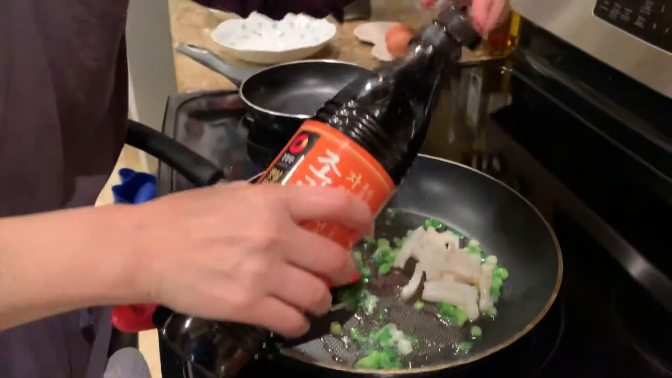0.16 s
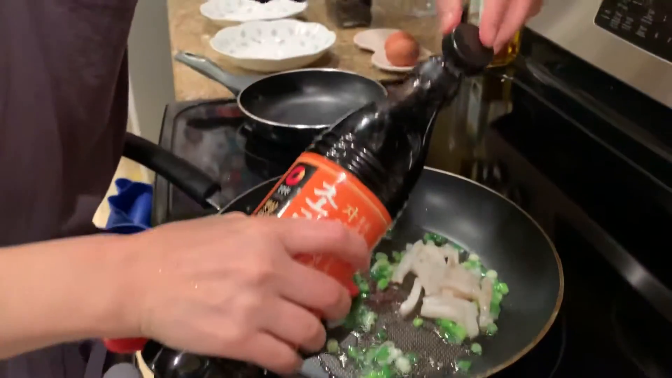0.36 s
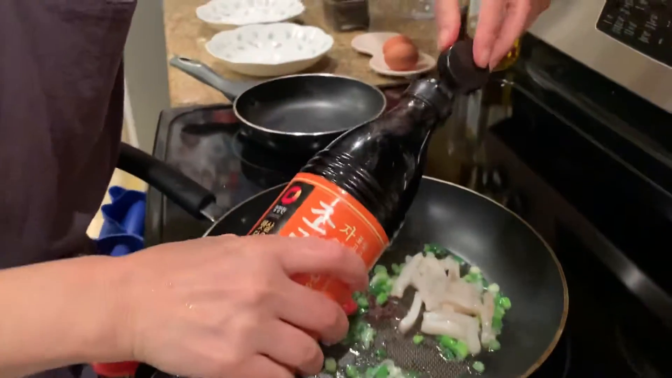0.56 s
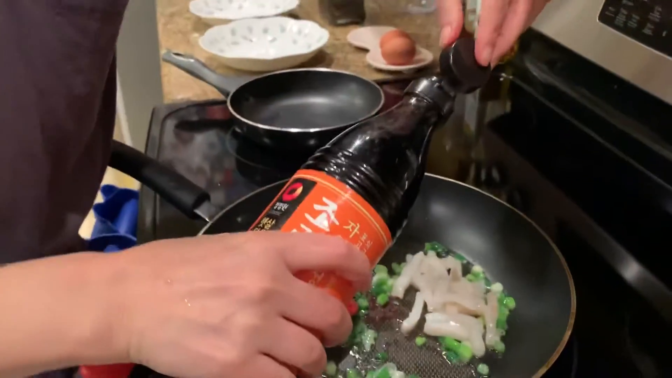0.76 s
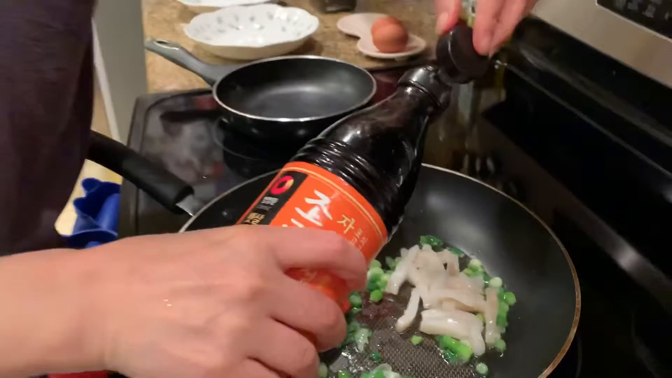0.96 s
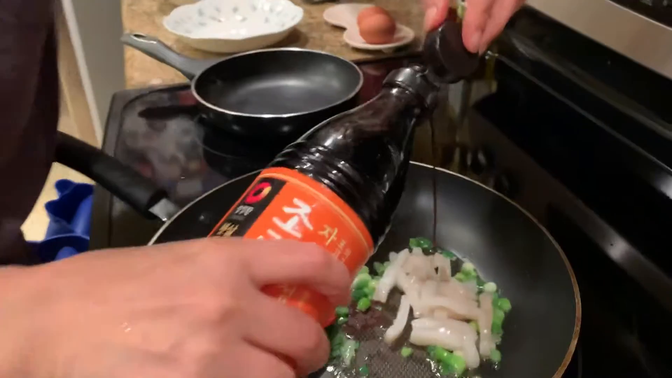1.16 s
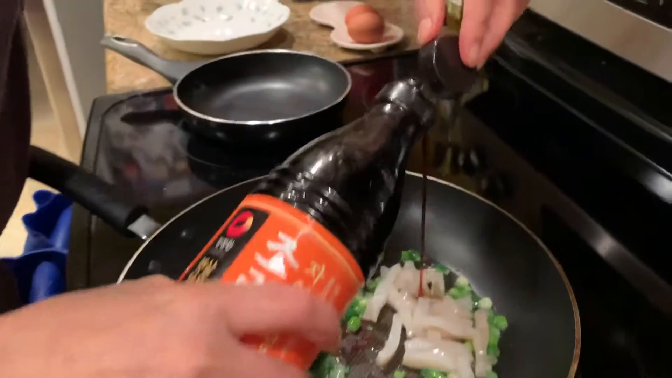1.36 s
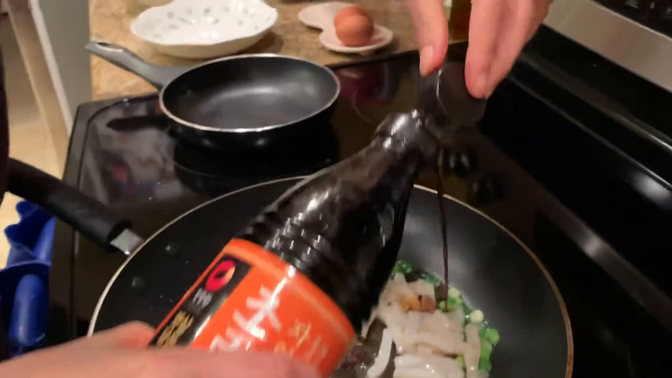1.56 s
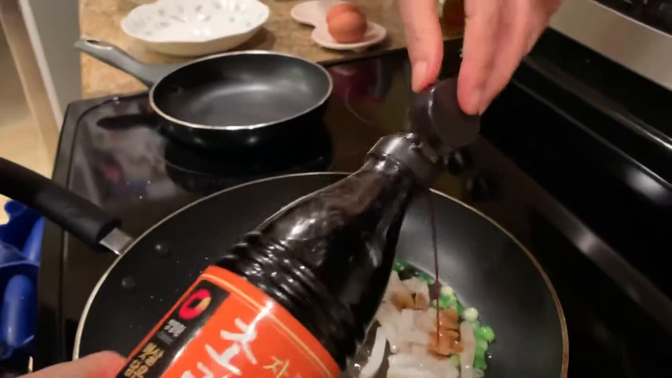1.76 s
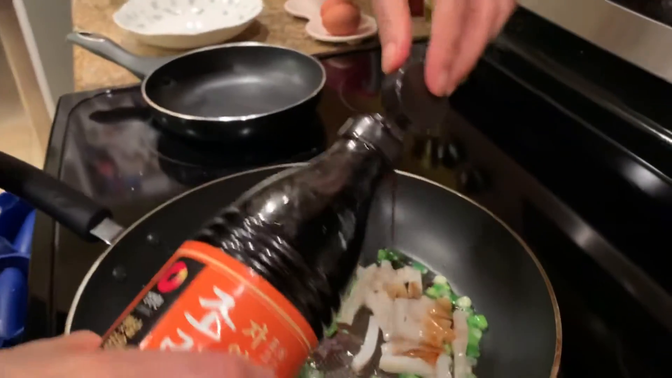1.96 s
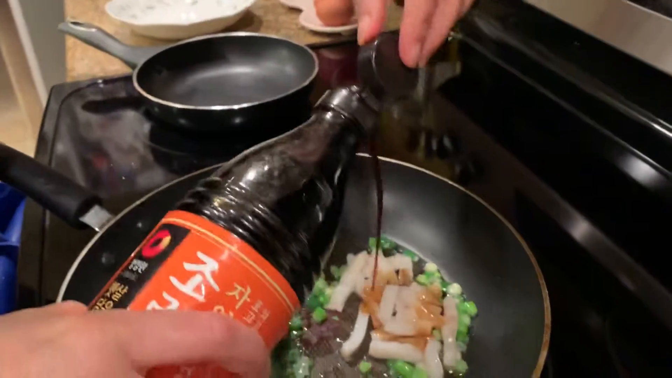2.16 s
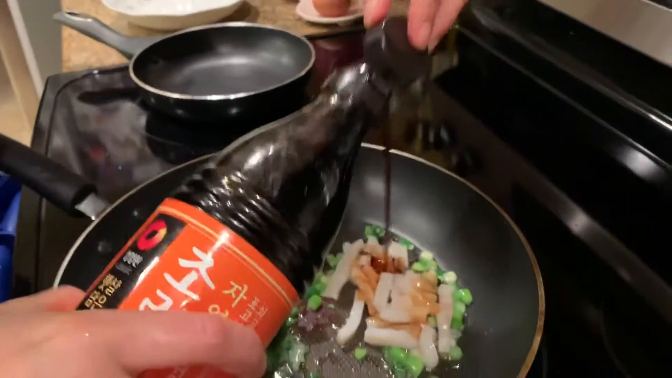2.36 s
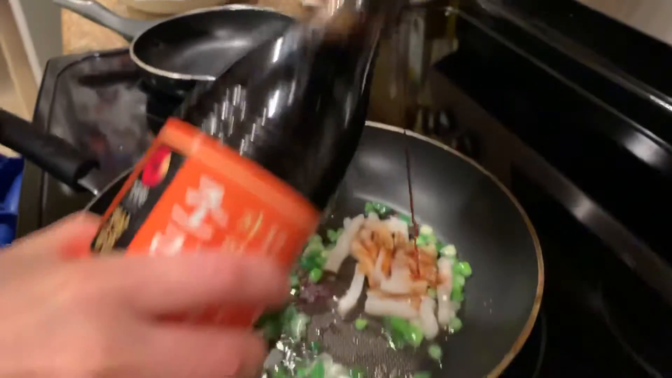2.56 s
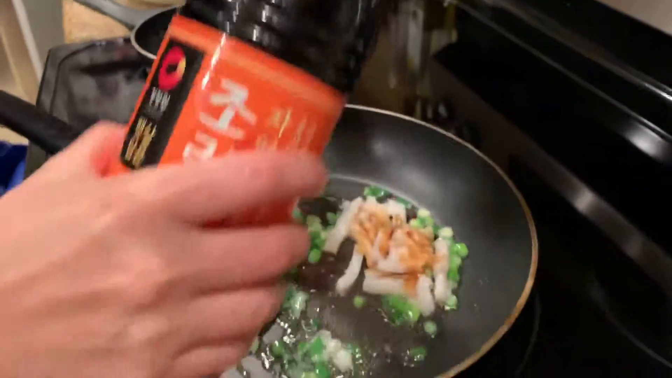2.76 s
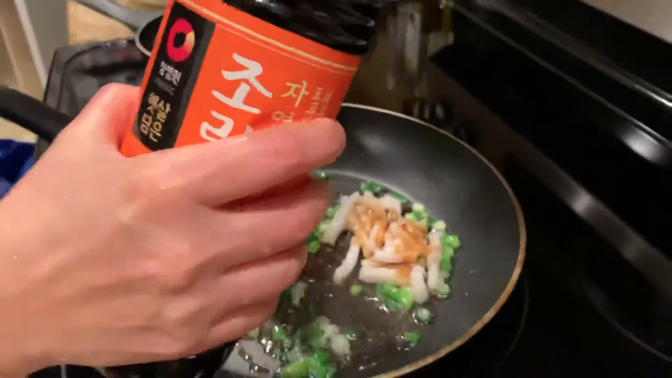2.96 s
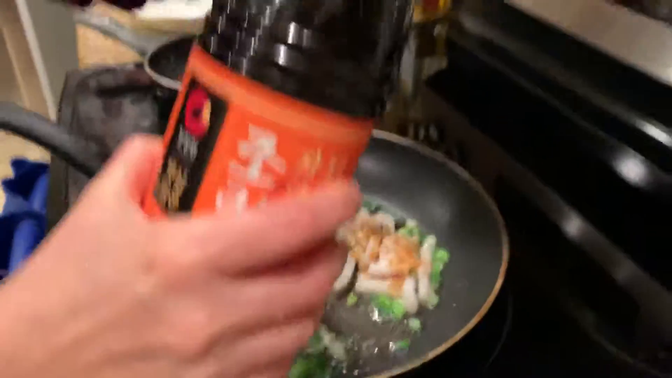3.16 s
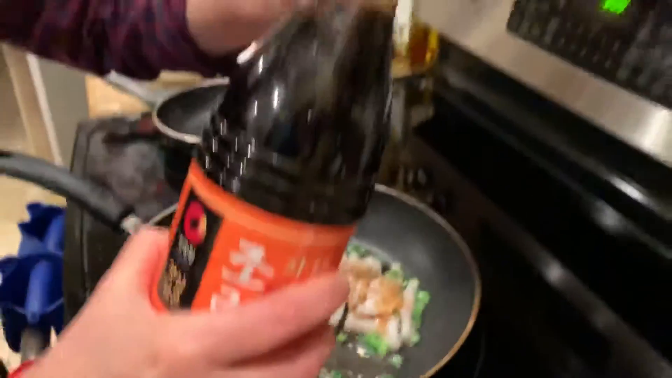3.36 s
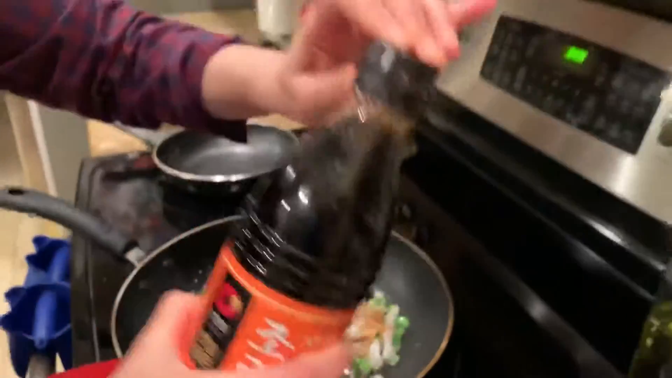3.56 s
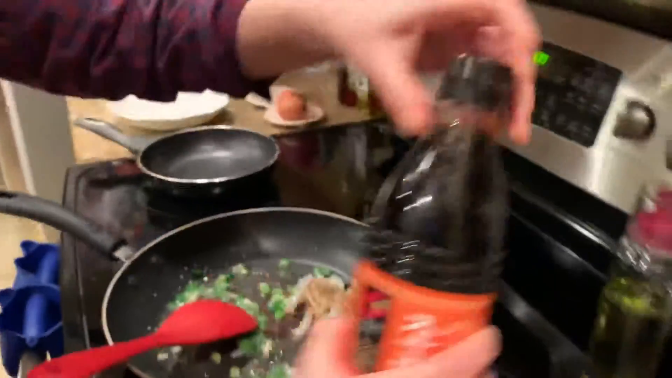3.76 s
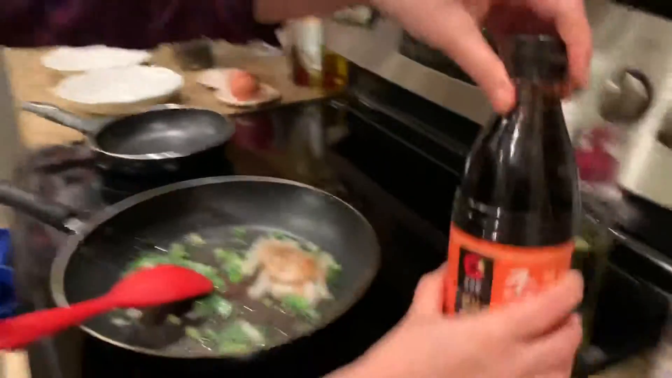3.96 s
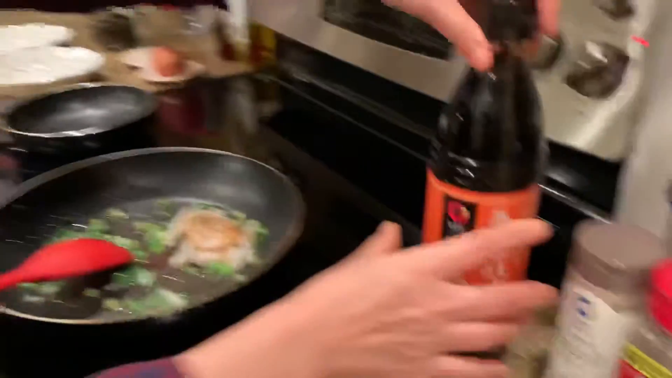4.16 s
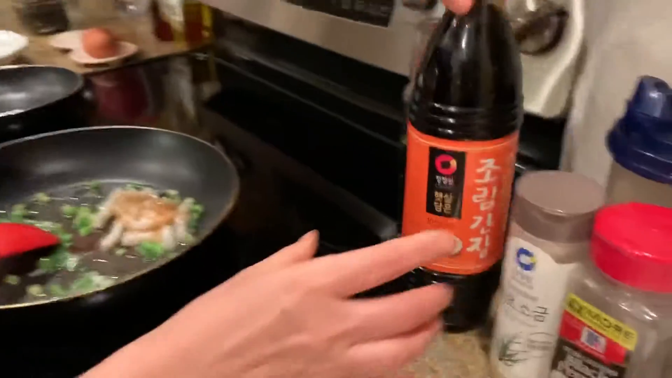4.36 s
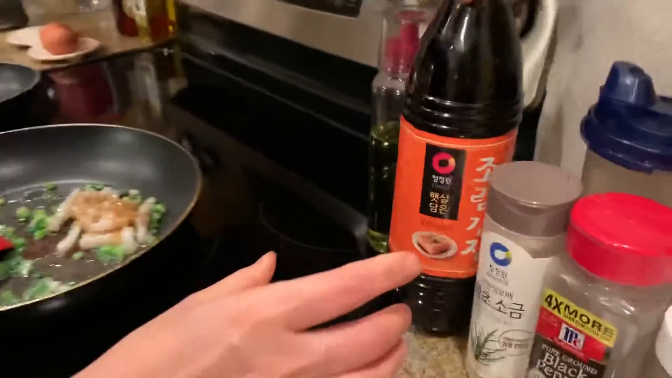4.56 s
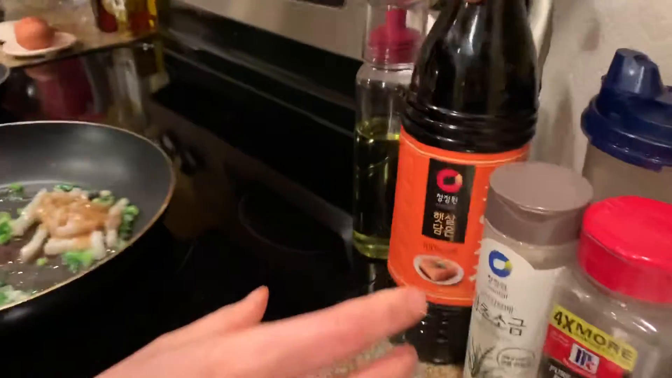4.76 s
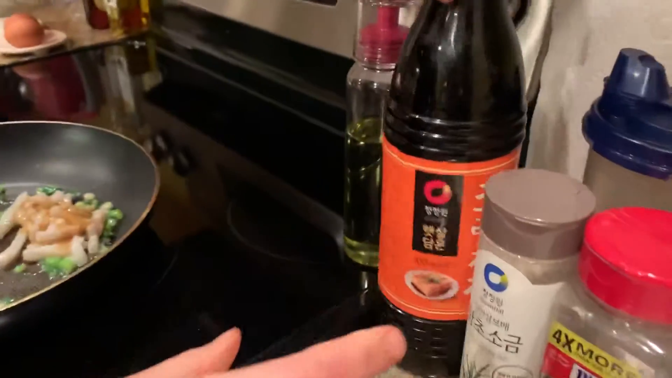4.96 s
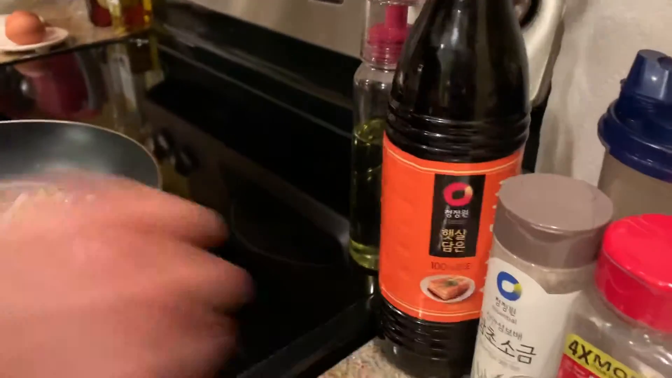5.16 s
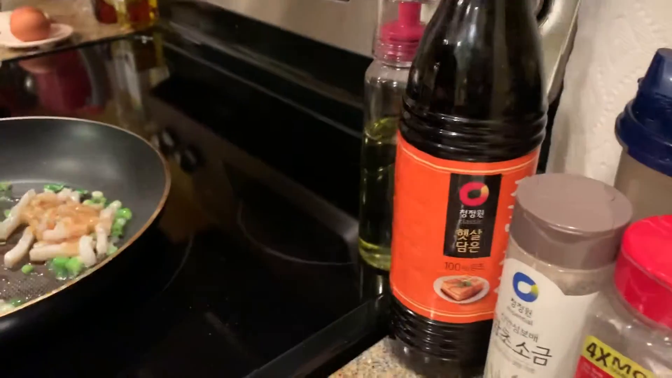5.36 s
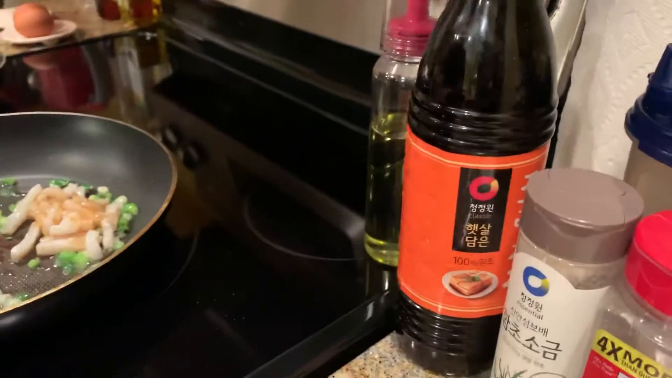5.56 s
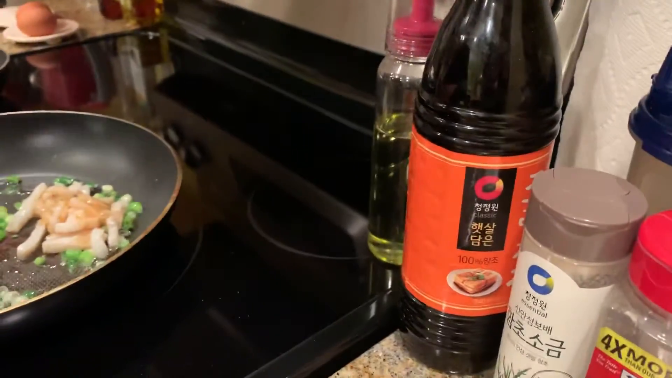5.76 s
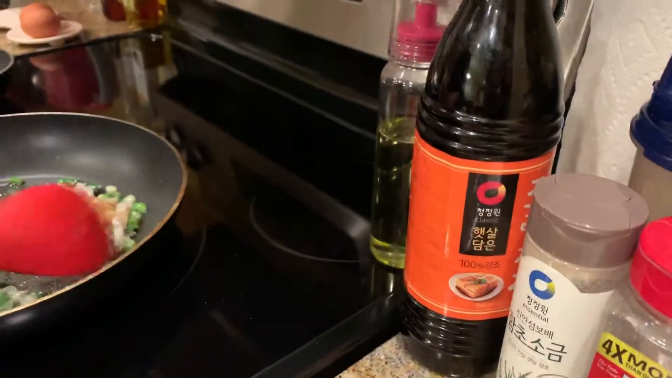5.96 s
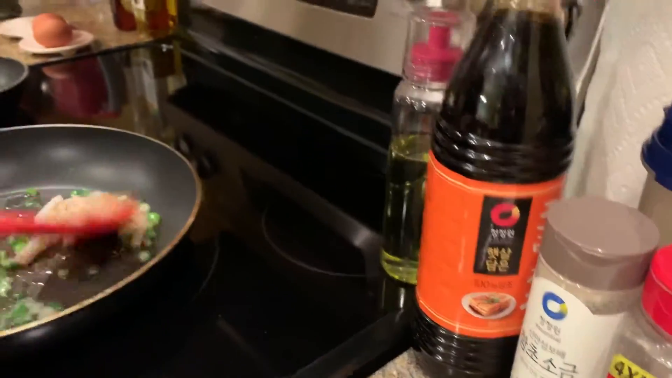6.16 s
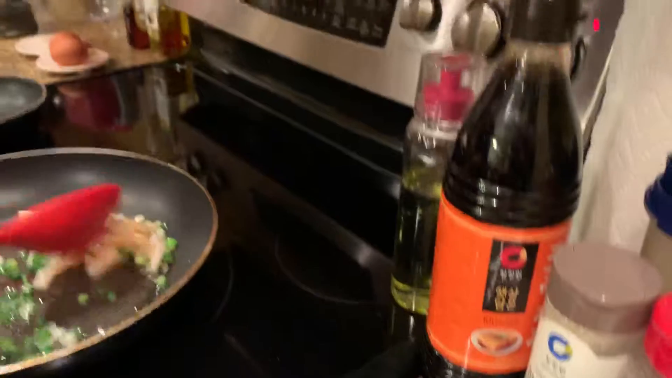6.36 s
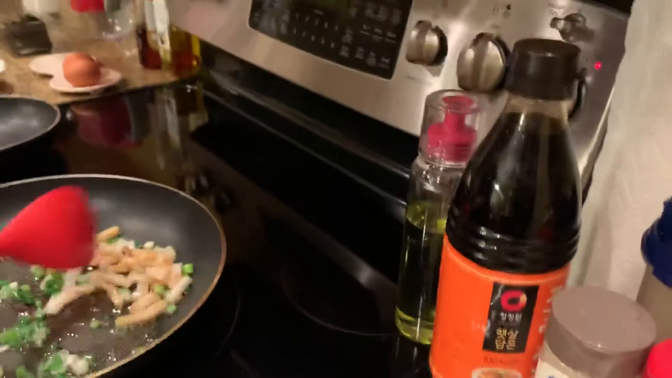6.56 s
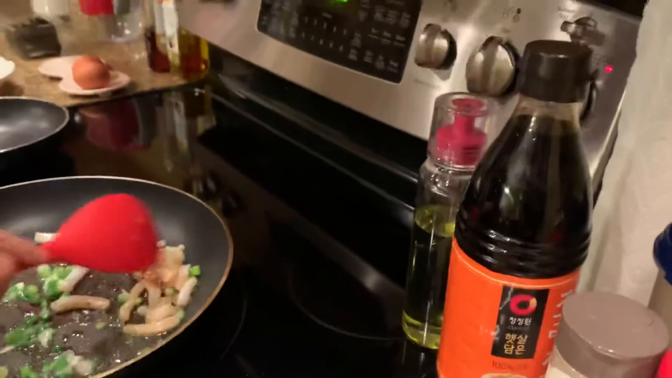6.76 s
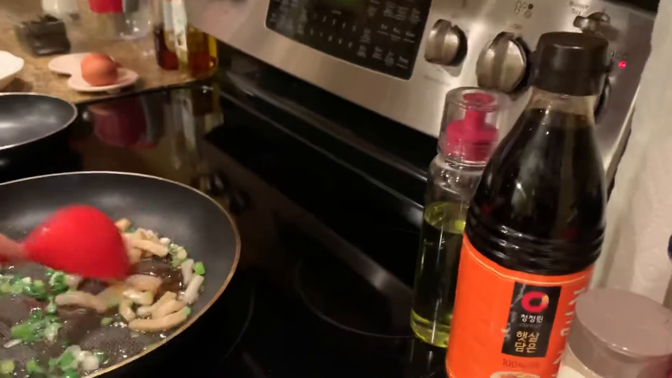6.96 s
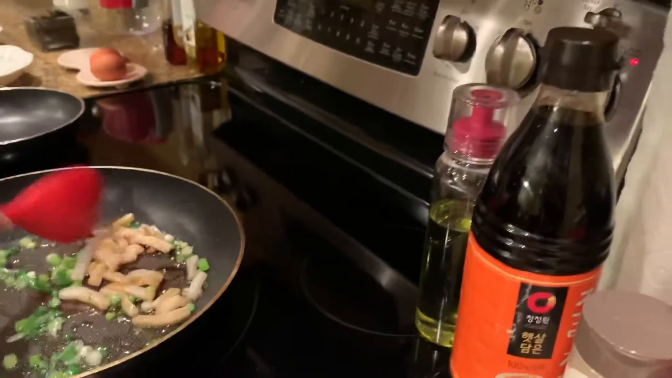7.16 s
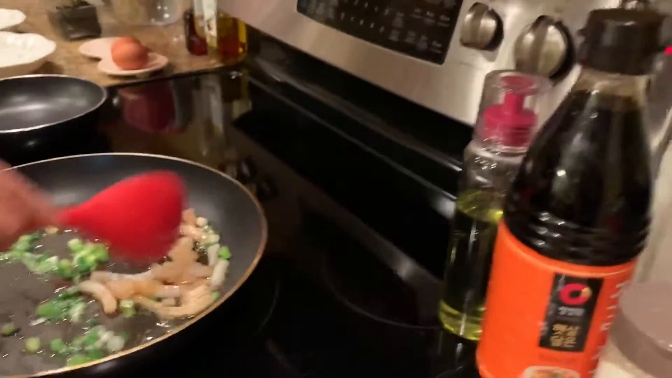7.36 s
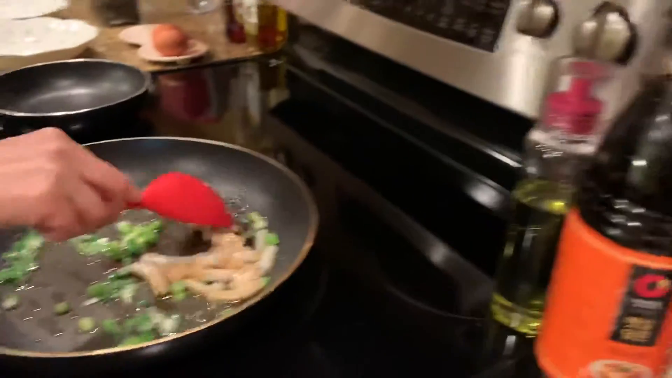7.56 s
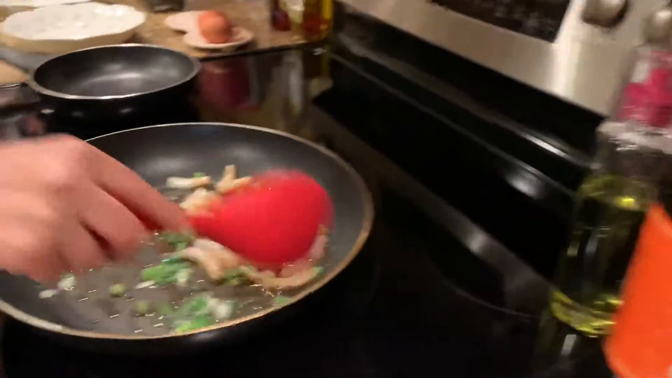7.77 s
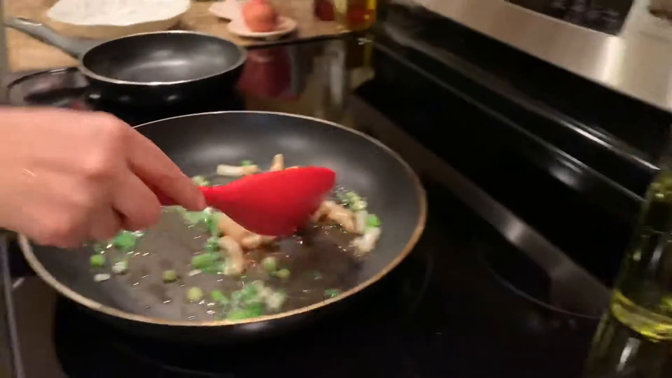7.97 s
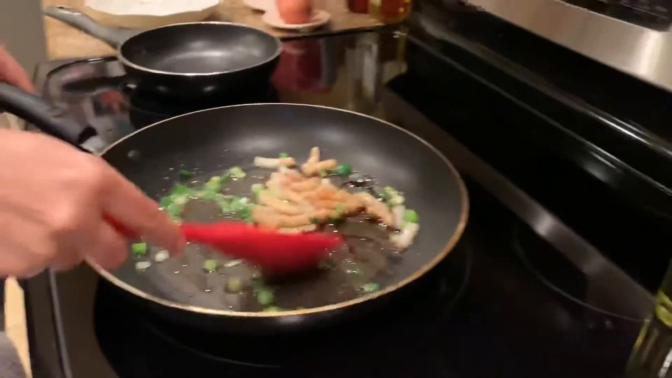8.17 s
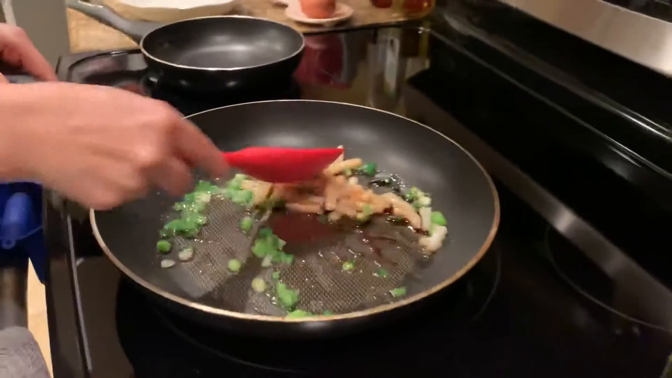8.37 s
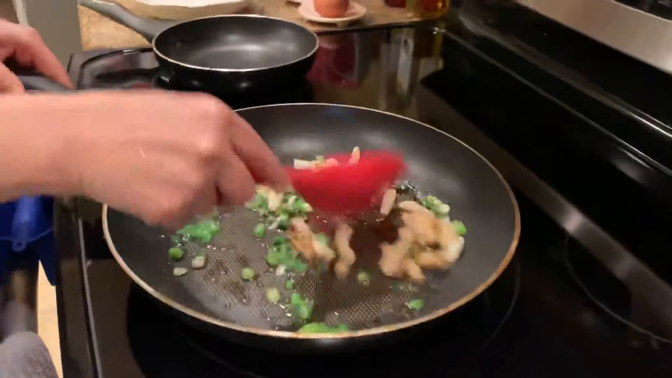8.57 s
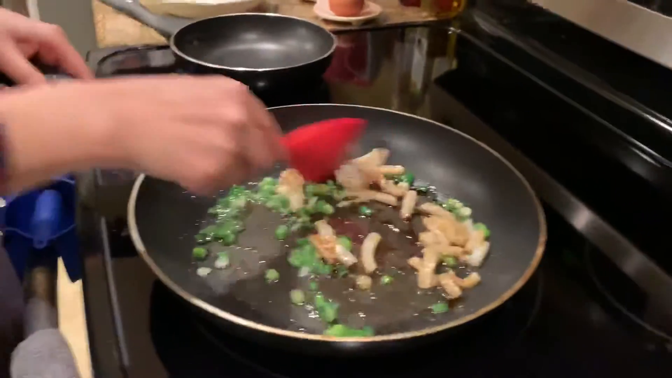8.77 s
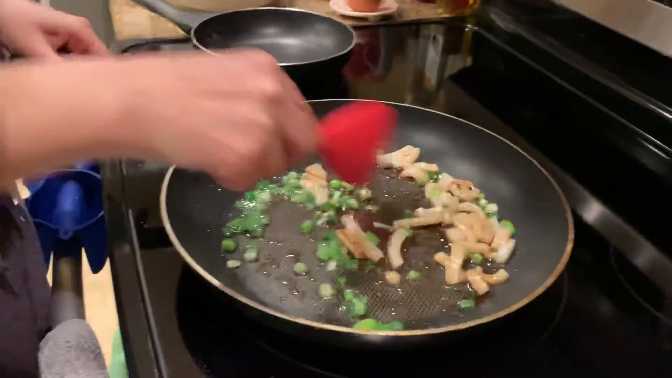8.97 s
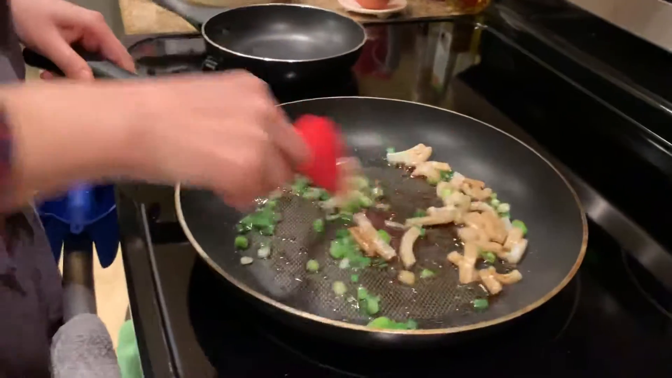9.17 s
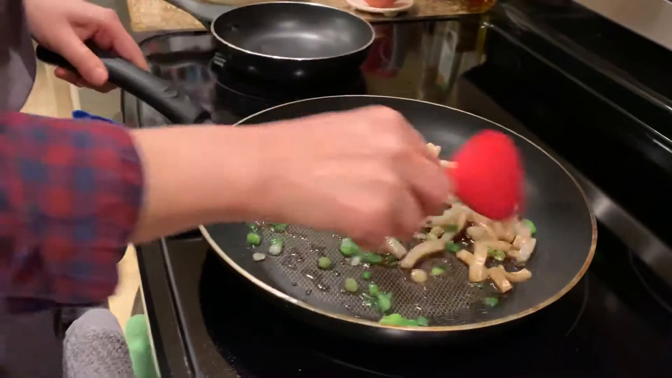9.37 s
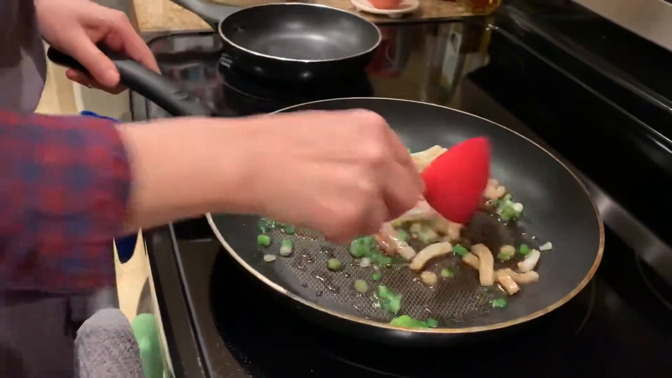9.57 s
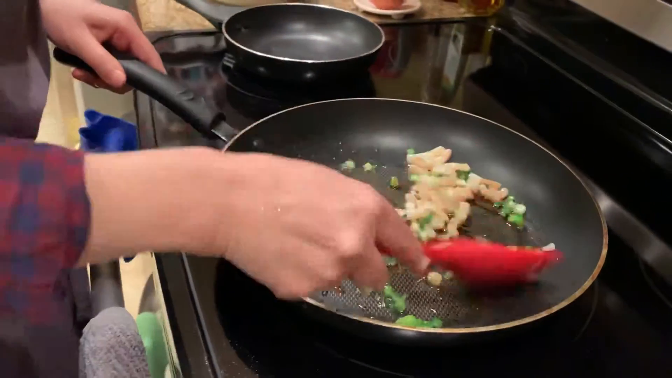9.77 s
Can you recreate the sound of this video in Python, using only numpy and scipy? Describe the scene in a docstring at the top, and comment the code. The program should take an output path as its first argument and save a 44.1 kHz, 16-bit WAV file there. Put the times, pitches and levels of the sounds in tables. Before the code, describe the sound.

Food sizzles in a pan of oil; a plastic bottle is snapped shut and set down, then a spatula stirs with soft thumps.

```python
"""A fierce sizzle comes first: steam bubbles burst and drops spit as squid and spring onion fry in oil,
in a nonstick pan on a glass hob. Poured sauce boils in patches; as the frying calms, the plastic bottle
is snapped shut and set down on the counter, sloshing. Then a silicone spatula stirs, thumping the pan
on the hob and pushing wet food onto hot metal, where the sizzle flares.
Heard close by in a small, murmuring kitchen, through a stereo microphone with two closely spaced ports."""
import sys
import numpy as np
from scipy import signal
from scipy.fft import rfft, irfft, next_fast_len
from scipy.io import wavfile
from scipy.ndimage import map_coordinates

SR = 44100
rng = np.random.default_rng(int(sys.argv[2]) if len(sys.argv) > 2 else 0)


def pcm_store(signal):
    """Save signal as 16-bit PCM."""
    levels = np.round(np.clip(np.atleast_2d(signal), -1, 1) * 32767)
    wavfile.write(sys.argv[1], SR, levels.astype(np.int16).T)


N = 432621

# Table levels are relative: each source's gain and filters and the room still act on them.
# slow course of the frying, fierce then calmer: t/s, fizz/dB, crackle/dB, sputter/dB, pan wall/dB
FRYING_COURSE = [(0.0, -43.5, -44, -52, -50), (0.6, -42.5, -45, -47.5, -58), (1.31, -41, -44.5, -47, -53.5),
                 (2.29, -43.5, -46, -45.5, -52), (2.59, -45.5, -47.5, -47.5, -51.5),
                 (3.08, -46, -46.5, -49.5, -54.5), (3.52, -49.5, -47, -49, -51),
                 (3.85, -50.5, -51.5, -52, -58), (4.12, -47, -51, -54.5, -55.5),
                 (5.81, -50, -49.5, -50.5, -52), (6.69, -50, -52, -63, -62), (7.45, -48, -50, -58, -59),
                 (7.94, -48, -55.5, -55.5, -55.5), (8.79, -45.5, -52.5, -53, -60.5),
                 (9.8, -49.5, -52, -55.5, -54)]
# where the pan lies from the microphone: t/s, lead at the left port/ms
LEFT_LEAD = [(0, 0.021), (1.5, 0.04), (3.5, 0.099), (4.5, 0.24), (6.5, 0.23), (7.7, 0.18), (8.6, 0.078),
             (9.8, 0.036)]
# spectra of the tiny, middling and large bubbles: f/Hz, level/dB
FIZZ_SPECTRUM = [(2500, -22.5), (4500, -25), (6000, -5), (7400, -4.5), (8300, 1), (10000, -4), (12500, -1),
                 (14000, -3), (16000, -4.5)]
CRACKLE_SPECTRUM = [(1200, -35), (2500, -12), (3400, -3.5), (4200, 0.5), (4900, 0), (5600, -2), (6800, -1),
                    (8000, -9.5), (16000, -4)]
SPUTTER_SPECTRUM = [(150, -28), (400, -16), (800, -10), (1200, -11), (1850, -3.5), (2600, -1.5), (3300, -2),
                    (5000, -9), (12000, -13)]
# the pan's wall: f/Hz, level/dB, t60/s
WALL_MODES = [(468, -8.5, 0.036), (656, -1.5, .03), (812, 3.5, 0.03), (915, 1.5, 0.028),
              (1070, 8.5, 0.0075), (1417, 2.5, .034), (1800, 3, 0.024), (1864, 1, 0.031), (2091, 2, 0.09),
              (2483, -2.5, 0.14), (3130, -1.5, 0.055)]
# juice and poured sauce boiling on hot metal: t/s, hold/s, level/dB, bubble f/Hz
SAUCE_PATCHES = [(0, 0.6, -52, 3990), (0.647, .12, -46, 3680), (0.897, 0.2, -50, 3680),
                 (1.238, 0.14, -52, 3160), (1.515, 0.083, -43.5, 3000), (1.33, 0.28, -62, 4400),
                 (1.348, 0.44, -52, 2660), (1.675, 0.096, -47, 4060), (1.98, 0.48, -45.5, 2740),
                 (2.098, 0.37, -45.5, 4020)]
# the kitchen's room tone: f/Hz, level/dB
MURMUR_SPECTRUM = [(20, -4), (35, 2.5), (62, -4), (100, -6.5), (180, -18), (350, -51), (1000, -13.5),
                   (3000, -22)]
# light taps in the pan: t/s, peak/dB, brightness/Hz
PAN_TAPS = [(.367, -37, 1000), (.912, -26, 3500), (2.709, -32, 2000), (3.053, -36, 2000),
            (4.155, -32, 2000), (6.184, -39, 700), (6.672, -39, 900), (8.385, -39, 1500),
            (8.760, -40.5, 2500), (9.276, -37, 1100), (9.601, -33, 1390), (9.785, -38, 1100)]
# the loudest water drops bursting in the oil: t/s, peak/dB, f/Hz, ping-to-crack ratio, crack t60/s
LOUD_SPITS = [(0.6204, -25.5, 4300, 1.3, 0.0054), (0.9135, -26, 2980, 0.14, .012),
              (1.214, -21, 13000, .2, .006), (1.4526, -18, 5560, 0.23, 0.018),
              (1.464, -28, 3160, 1.3, 0.0069), (1.501, -19, 11600, .47, 0.0065),
              (2.154, -20, 14500, .3, 0.014), (2.337, -20, 3000, 0.67, .008),
              (2.395, -6.5, 5050, 0.12, 0.0073), (2.485, -23, 11000, .2, .02), (2.528, -21, 9500, .4, .006),
              (2.6676, -18, 7240, 3.6, .004), (2.925, -25, 9000, .2, 0.0098),
              (3.4549, -23, 6500, 0.81, .012), (3.627, -25, 9900, .1, 0.022),
              (3.808, -29, 11800, 0.41, .008), (3.8924, -26, 14900, .2, .006),
              (4.1992, -23, 11700, .17, 0.0056), (4.425, -27.5, 11200, .18, 0.0054),
              (4.5353, -26, 12500, .35, .005), (4.71, -23.5, 15000, 0.27, .006),
              (5.2126, -32, 15200, .2, 0.0064), (5.622, -24, 10900, .1, .002),
              (5.624, -20.5, 7640, 0.43, 0.007), (6.4375, -20.5, 4970, 0.11, 0.0064),
              (6.4816, -23, 13400, .65, 0.0063), (6.801, -25, 9800, .1, 0.0043),
              (6.952, -22, 13000, .2, 0.0034), (7.217, -22, 10800, 0.096, 0.004),
              (7.4595, -21, 7860, 1.1, 0.0045), (7.663, -26, 7840, 3, .01),
              (7.694, -23.5, 15000, .2, 0.0073), (7.728, -29.5, 7900, 2, .005),
              (8.2009, -18, 11600, .15, 0.0036), (8.22, -29, 11500, 2, 0.0055),
              (8.7613, -28, 4000, .1, .005), (9.019, -22, 9500, .3, .005)]
# the cap pressed shut: t/s, peak/dB, brightness/Hz
CAP_PRESS = [(3.479, -19, 2500)]
# the cap's ring: f/Hz, level/dB, t60/s
PLASTIC_CAP_MODES = [(182, -3.5, 0.056), (250, 1.5, 0.026), (410, -6, 0.023), (590, -8, 0.026),
                     (863, -3.5, 0.021), (1190, -6.5, 0.023), (1440, -13.5, 0.015), (1803, -15, 0.027),
                     (2860, -9, .012)]
# the bottle's knocks: t/s, peak/dB, brightness/Hz, pitch ratio, deep-mode lift/dB
BOTTLE_CONTACTS = [(4.293, -28, 900, 0.93, -8), (4.301, -23.5, 560, 1, 2), (4.322, -31.5, 330, .97, 9),
                   (4.337, -32, 330, 1.07, -9), (4.358, -34, 200, 0.98, 4), (4.733, -28, 900, 0.98, -3),
                   (4.745, -31, 890, 1.02, -5), (4.755, -30, 940, 1.05, -2), (4.767, -31.5, 710, 1.1, 2),
                   (4.805, -30, 1440, 0.96, 7), (4.819, -34, 1240, 1.06, -3),
                   (4.832, -40.5, 1080, 0.86, -4), (4.873, -39.5, 870, 0.96, -5),
                   (5.022, -40.5, 620, 1, -5), (5.15, -39, 300, 0.98, 5), (5.19, -40, 190, .9, 7)]
# the full bottle on the counter: f/Hz, level/dB, t60/s
FULL_BOTTLE_MODES = [(43, -22, 0.46), (58.5, -18, 0.58), (75, -15, 0.28), (100, -17, 0.14), (125, -6, 0.14),
                     (212, -5.5, .05), (277, 3.5, 0.034), (333, -2.5, .045), (470, -7, .025), (555, 0, .03),
                     (604, 2, 0.052), (913, -8, 0.035), (1150, -5, .035), (1320, -3, .03)]
# sauce moving in the bottle: t/s, level/dB, t60/s, f/Hz
BOTTLE_SLOSHES = [(4.311, -37.5, 0.97, 62.3), (5.16, -45.5, 0.65, 125)]
# spatula strokes: t/s, thump peak/dB, brightness/Hz, pitch ratio, deep-mode lift/dB,
# sizzle flare/dB, flare delay/s
SPATULA_STROKES = [(5.825, -41, 330, 1.37, 2.5, -1.5, 0.11), (6.072, -26, 393, 1.12, -6, 4, 0.018),
                   (6.083, -33.5, 170, 1.17, -5, -1, 0), (6.126, -36.5, 160, 0.92, -6, 1.5, 0),
                   (6.672, -28.5, 210, 1.03, -5, 1, 0), (6.939, -65, 80, 1, 2, 3, 0.059),
                   (7.248, -32, 110, 1.05, -6, 5, 0.076), (7.875, -33.5, 300, 0.93, -4, 4, 0.046),
                   (7.912, -36, 130, 1.2, -1, -1.5, 0.028), (8.176, -35.5, 190, 1.04, -0.5, 4.5, 0.006),
                   (8.815, -36, 110, 1.01, -6, -1.5, 0.0075), (9.216, -28, 169, 0.96, -10, 3, 0.039),
                   (9.539, -38.5, 140, 0.97, -17, 1, 0.058), (9.78, -32.5, 240, 1.18, -1, -4, .04)]
# the pan rocking loosely on the hob: f/Hz, level/dB, t60/s
ROCKING_MODES = [(63.5, -11, 0.47), (73.7, -16.5, 0.61), (113, -13.5, 0.35), (127, -8, 0.34),
                 (141, -1, 0.053), (175.4, 4.0, 0.055), (210, -1, 0.044), (242, -9.5, 0.094),
                 (310, -10, 0.025), (404, -5, 0.021), (550, -11.5, 0.039), (800, -8, 0.051)]
# share of a flare taken up by: fizz, crackle, sputter, pan wall
FLARE_UPTAKE = [0.97, 0.87, 0.58, 0.66]
# the spatula dragged over the pan: t/s, peak/dB, brightness/Hz
SPATULA_DRAGS = [(6.09, -53, 900), (6.669, -47, 900), (7.33, -49, 4000), (7.885, -43, 1600),
                 (8.58, -45, 3000), (9.245, -46, 3500), (9.76, -46, 2500)]
# the ring under the blade, damped by wet food: f/Hz, level/dB, t60/s
DAMPED_MODES = [(840, 3, 0.0066), (1380, -2, 0.0083), (2130, 8.5, 0.012), (2930, 9, 0.005),
                (4300, 12.5, 0.0069)]
# wet food coming unstuck from the spatula: t/s, peak/dB, f/Hz
FOOD_RELEASES = [(8.252, -34, 2840), (8.546, -39, 2360), (8.628, -36, 2220), (8.692, -33, 2960),
                 (8.921, -27.5, 1900), (9.071, -37, 2610), (9.239, -37, 2520), (9.323, -35, 3730),
                 (9.382, -32, 3600), (9.451, -31, 3900), (9.602, -33, 2290), (9.653, -38, 1970)]

KITCHEN_T60_S, SPLASH_T60_S = 0.15, 0.06   # the room's tail and the first, quick echoes


def from_db(db):
    """Decibels to gain."""
    return 10 ** (np.asarray(db) / 20)


def rms_one(x):
    """Scale to unit power."""
    return x / np.sqrt(np.mean(x ** 2) + 1e-20)


def in_time(rows):
    """One curve per column, a value for every sample."""
    times, *columns = np.transpose(rows)
    return [np.interp(np.arange(N) / SR, times, column) for column in columns]


def filtered(x, response):
    """Apply a response given as a function of frequency."""
    size = next_fast_len(N + 4096)
    hz = np.arange(size // 2 + 1) * SR / size
    return irfft(rfft(x, size) * response(hz), size)[..., :N]


def butter(x, kind, hz, order=2):
    """Low-, high- or band-pass filter."""
    return signal.sosfilt(signal.butter(order, hz, kind, fs=SR, output="sos"), x)


def coloured(x, spectrum):
    """Shape a signal with a smooth spectrum; unit power."""
    hz, level_db = np.transpose(spectrum)
    return rms_one(filtered(x, lambda f: from_db(np.interp(np.log(f + 1), np.log(hz), level_db))))


def drift(per_s):
    """A random wander of unit power."""
    knots = rng.standard_normal(4000)
    return rms_one(np.interp(np.arange(N) / SR * per_s, np.arange(len(knots)), knots))


def ring(x, hz, t60):
    """One mode: a unit click sets a sine of height 1 ringing."""
    radius, angle = from_db(-60 / (t60 * SR)), 2 * np.pi * hz / SR
    return signal.lfilter([0, np.sin(angle)], [1, -2 * radius * np.cos(angle), radius ** 2], x + 1e-18)


def dying(t, t60):
    """An envelope that falls 60 dB in t60."""
    return np.exp(-np.log(1000) * t / t60)


def swell(start_s, attack_s, hold_s, release_s):
    """An envelope that rises to 1, holds and falls."""
    corners = np.cumsum([start_s, attack_s, hold_s, release_s])
    return np.interp(np.arange(N) / SR, corners, [0, 1, 1, 0])


def add(track, s, sound):
    """Mix a sound into a track at a given time."""
    at = int(np.clip(round(s * SR), 0, N - 1))
    track[at:at + len(sound)] += sound[:N - at]


def kitchen(x, room_db):
    """The room's short tail, thin in the bass; each microphone port hears its own."""
    t = np.arange(SR // 2) / SR
    tails = rms_one(rng.standard_normal((2, len(t))) * dying(t, KITCHEN_T60_S) * (t > .004))
    tails = butter(tails, "high", 400, order=1) / np.sqrt(len(t))
    return from_db(room_db) * signal.fftconvolve(x[None], tails, axes=1)[:, :N]


def at_ports(x, echoes, alike_hz=750):
    """Direct sound reaches the left port first; long waves of the echoes are alike at both ports."""
    lead_ms, = in_time(LEFT_LEAD)
    early = map_coordinates(x, [np.arange(N) + lead_ms * SR / 1000], order=3)
    apart = lambda f: np.pi / 2 * f / (f + alike_hz)
    shared_echo = filtered(echoes[1], lambda f: np.cos(apart(f)))
    own_echo = filtered(echoes[0], lambda f: np.sin(apart(f)))
    return np.array([early + shared_echo + own_echo, x + echoes[1]])


def scattered(x, splash_db, room_db):
    """Bubbles at the microphone: each bursts at another spot, so their echoes blur into noise."""
    power = 0
    for level_db, t60 in (splash_db, SPLASH_T60_S), (room_db, KITCHEN_T60_S):
        keep = dying(2 / SR, t60)
        power = power + from_db(2 * level_db) * signal.lfilter([1 - keep], [1, -keep], x ** 2)
    return at_ports(x, np.sqrt(power) * rng.standard_normal((2, N)))


def bubbles(per_s, spread_db, clump_db, cycles, ring_share, band_hz, pitch_count=16):
    """Steam bubbles burst in clumps: each is a click of random size with a brief ring."""
    sizes = from_db(spread_db * np.minimum(rng.exponential(1, N), 5.5)) * rng.choice([-1, 1], N)
    bursts = rng.random(N) < per_s / SR
    clicks = sizes * bursts * from_db(clump_db * (drift(30) + drift(140)))
    dealt = rng.integers(0, pitch_count, N)
    pitches = np.linspace(*band_hz, pitch_count)
    rings = sum(ring(clicks * (dealt == k), hz, cycles / hz) * np.sqrt(hz)
                for k, hz in enumerate(pitches))
    return rms_one(rms_one(clicks) + ring_share * rms_one(rings))


def pings(per_s, ring_t60, spread_db, low_hz, high_hz):
    """A few bubbles ring on in the oil, each at its own pitch and in another phase at each port."""
    when, pitch, size, phase = rng.random((int(per_s * N / SR), 4)).T[..., None]
    t = np.arange(1500) / SR
    hz = low_hz * (high_hz / low_hz) ** pitch
    envelope = from_db(spread_db * size) * dying(t, ring_t60)
    at = ((when * N).astype(int) + np.arange(len(t))).ravel()
    ports = [envelope * np.sin(2 * np.pi * hz * t + np.pi * turn) for turn in (phase - .5, 0)]
    return rms_one(np.array([np.bincount(at, port.ravel(), N)[:N] for port in ports]))


def sizzle():
    """Bubbles of three sizes fizz, crackle and sputter; the pan's wall rings under the bursts."""
    flare_db, waver_db = flares(), 0.72 * drift(per_s=12)
    fizz_db, crackle_db, sputter_db, wall_db = [
        slow_db + waver_db + share * flare_db
        for slow_db, share in zip(in_time(FRYING_COURSE), FLARE_UPTAKE)]
    tiny = bubbles(8000, spread_db=3.5, clump_db=1.3, cycles=9, ring_share=.85, band_hz=(5000, 15700))
    middling = bubbles(5000, spread_db=4, clump_db=.87, cycles=5.1, ring_share=1, band_hz=(2500, 6500))
    large = bubbles(3500, spread_db=5, clump_db=1.03, cycles=7.2, ring_share=.79, band_hz=(1220, 3500))
    thuds = bubbles(2500, spread_db=4.5, clump_db=2, cycles=3.6, ring_share=.13, band_hz=(520, 2500))
    tiny = scattered(tiny, splash_db=-1, room_db=-4)
    middling = scattered(middling, splash_db=1, room_db=-2)
    large = scattered(large, splash_db=8, room_db=-20.5)
    thuds = scattered(thuds, splash_db=-2, room_db=-29)
    high_pings = .5 * pings(per_s=200, ring_t60=.02, spread_db=12, low_hz=6500, high_hz=15500)
    low_pings = .42 * pings(per_s=320, ring_t60=.036, spread_db=8, low_hz=1600, high_hz=6500)
    fizz = from_db(fizz_db + 3.5) * coloured(tiny + high_pings, FIZZ_SPECTRUM)
    crackle = from_db(crackle_db + 1.5) * coloured(middling + low_pings, CRACKLE_SPECTRUM)
    sputter = from_db(sputter_db + 0.93) * coloured(large + low_pings, SPUTTER_SPECTRUM)
    wall_ring = sum(from_db(db) * ring(thuds, hz, t60) for hz, db, t60 in WALL_MODES)
    wall = from_db(wall_db) * rms_one(butter(wall_ring, "high", 290))   # the wall's ring is kept light in the bass
    # the crackle favours the right port, the deeper sounds the left
    return fizz + crackle * from_db([[-.6], [.6]]) + (sputter + wall) * from_db([[1.1], [-1.1]])


def sauce(width_hz=360):
    """Wet patches boil up on the hot metal, each in bubbles of nearly one size."""
    boil = bubbles(4000, spread_db=7.5, clump_db=3.4, cycles=8.2, ring_share=.93, band_hz=(2390, 4630))
    boil = scattered(boil, splash_db=8, room_db=4)
    out = 0
    for s, hold_s, level_db, hz in SAUCE_PATCHES:
        patch = rms_one(butter(boil, "band", [hz - width_hz / 2, hz + width_hz / 2]))
        out = out + from_db(level_db) * swell(s, 0.045, hold_s, 0.075) * patch
    return out


def murmur():
    """The kitchen's low room tone, nearly the same at both ports."""
    common, apart = coloured(rng.standard_normal((2, N)), MURMUR_SPECTRUM)
    return from_db(-59) * (common + from_db(-12.5) * apart * [[1], [-1]])


def blows(events, modes, vary_db, rub, rub_t60, deep_below_hz=135):
    """Each contact is a push and some rubbing, dulled by its softness, that rings a body's modes."""
    out, t = np.zeros(N), np.arange(SR * 2 // 3) / SR
    is_deep = np.array(modes)[:, 0] < deep_below_hz

    def blow(peak_db, bright_hz, pitch_ratio=1, deep_db=0):
        """Each contact has its own pitch and its own amount of bass."""
        force = (t == 0) + rub * rng.standard_normal(len(t)) * dying(t, rub_t60)
        force = butter(force, "low", bright_hz)
        strengths_db = vary_db * rng.standard_normal(len(modes)) + deep_db * is_deep
        body = sum((-1) ** k * from_db(db + strengths_db[k]) * ring(force, hz * pitch_ratio, t60)
                   for k, (hz, db, t60) in enumerate(modes))
        return from_db(peak_db) * body / np.abs(body).max()

    for s, *contact in events:
        add(out, s, blow(*contact))
    return out


def pan_taps():
    """Light taps ring the pan's thin wall, with little bass."""
    taps = blows(PAN_TAPS, WALL_MODES, vary_db=0, rub=0.1, rub_t60=0.022)
    return from_db(-1.5) * butter(taps, "high", 290)


def small_spits(per_s=3, over_fizz_db=16, spread_db=3, low_hz=6230, high_hz=14800, crack_t60=0.0036):
    """Small drops burst at random, louder while the frying is fierce; rows as in LOUD_SPITS."""
    when, size, pitch, ping = rng.random((int(per_s * N / SR), 4)).T
    fizz_db = in_time(FRYING_COURSE)[0][(when * N).astype(int)]
    peak_db = fizz_db + over_fizz_db + spread_db * (2 * size - 1)
    hz = low_hz + pitch * (high_hz - low_hz)
    return list(zip(when * N / SR, peak_db, hz, ping, np.full(len(when), crack_t60)))


def spits(ping_t60=0.01, spray_db=-22, spray_t60=0.03):
    """A water drop bursts with a sharp crack and a short ping, then sprays fine oil."""
    out, t = np.zeros(N), np.arange(2000) / SR
    for s, peak_db, hz, ping, crack_t60 in list(LOUD_SPITS) + small_spits():
        noise = rng.choice([-1., 1.], (2, len(t)))
        crack, hiss = butter(noise, "high", 0.58 * hz)   # small drops crack brighter
        burst = crack * dying(t, crack_t60) + ping * np.sin(2 * np.pi * hz * t) * dying(t, ping_t60)
        spray = from_db(spray_db) * hiss * dying(t, spray_t60)
        add(out, s, from_db(peak_db) * (burst / np.abs(burst).max() + spray))
    return from_db(3) * out


def cap_snap():
    """The cap snaps shut, with little bass in the snap."""
    snap = blows(CAP_PRESS, PLASTIC_CAP_MODES, vary_db=3, rub=0.023, rub_t60=0.013)
    return butter(snap, "high", 165)


def bottle_knocks():
    """The bottle lands on its rim, rocks, chatters to rest and nudges its neighbours."""
    return blows(BOTTLE_CONTACTS, FULL_BOTTLE_MODES, vary_db=2.5, rub=0.07, rub_t60=0.06)


def slosh():
    """The jolted sauce rumbles unevenly, over about an octave, until it settles."""
    out, t = np.zeros(N), np.arange(SR) / SR
    for s, level_db, t60, hz in BOTTLE_SLOSHES:
        surge = butter(rng.standard_normal(SR), "band", [hz / np.sqrt(2), hz * np.sqrt(2)])
        add(out, s, from_db(level_db) * rms_one(surge) * dying(t, t60))
    return out


def hob_thumps():
    """The soft spatula's strokes rock the pan on the glass hob."""
    pushes = [stroke[:5] for stroke in SPATULA_STROKES]
    return blows(pushes, ROCKING_MODES, vary_db=4.5, rub=0.015, rub_t60=0.33)


def flares():
    """The sizzle's change in dB: most strokes lift it, pushing wet food onto hot metal; some dip it."""
    return sum(flare_db * swell(s + delay_s, attack_s=0.017, hold_s=0.058, release_s=0.076)
               for s, *_, flare_db, delay_s in SPATULA_STROKES)


def scrapes():
    """The blade rubs over the pan; wet food squeezed under it damps the ring."""
    return from_db(3.5) * blows(SPATULA_DRAGS, DAMPED_MODES, vary_db=5, rub=1.2, rub_t60=0.3)


def squelches(slips_per_s=1500, slip_t60=0.048, pocket_t60=0.0059):
    """Wet food lets go of the blade in a dying run of tiny slips that ring one small pocket."""
    out, t = np.zeros(N), np.arange(4000) / SR
    for s, peak_db, hz in FOOD_RELEASES:
        slipping = rng.random(len(t)) < slips_per_s / SR
        slips = (t == 0) + slipping * rng.standard_normal(len(t)) * dying(t, slip_t60)
        pocket = ring(slips, hz, pocket_t60)
        add(out, s, from_db(peak_db) * pocket / np.abs(pocket).max())
    return from_db(-5) * out


def scene():
    """Pan, bottle and room at the microphone; the dull contacts carry more room than the sharp ones."""
    sharp = spits() + pan_taps()
    dull = hob_thumps()
    sharp += bottle_knocks() + cap_snap()
    dull += scrapes() + squelches() + slosh()
    echoes = kitchen(sharp, room_db=-8.5) + kitchen(dull, room_db=1)
    contacts = at_ports(sharp + dull, echoes, alike_hz=540)
    return murmur() + sizzle() + sauce() + contacts


def record(dry):
    """The microphone: both channels share the right port's treble, the left late; the top is cut."""
    split_hz, lag_s, cutoff_hz = 6500, .000258, 15900
    left, right = dry
    crossover = lambda f: np.pi / 2 * (1 - 1 / (1 + (f / split_hz) ** 12))
    own = filtered(left, lambda f: np.cos(crossover(f)))
    shared = filtered(right, lambda f: np.sin(crossover(f)) * np.exp(-2j * np.pi * f * lag_s))
    return filtered(np.array([own + shared, right]), lambda f: 1 / np.sqrt(1 + (f / cutoff_hz) ** 300))


dry = scene()
out = record(dry)
pcm_store(out)
```